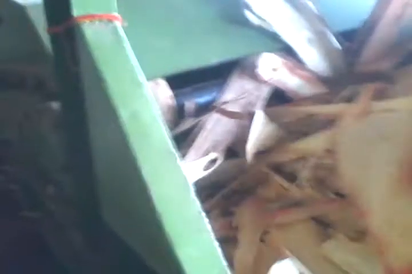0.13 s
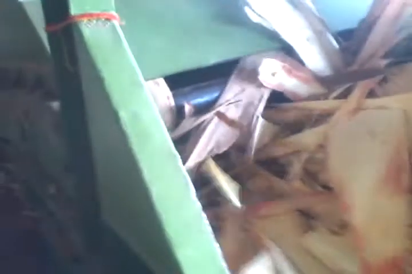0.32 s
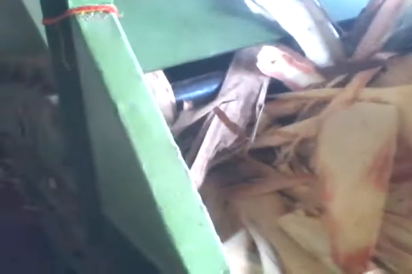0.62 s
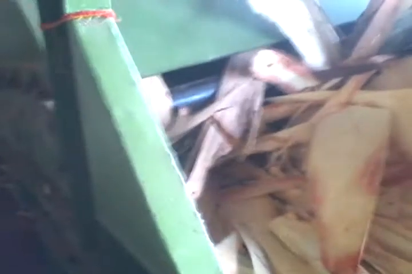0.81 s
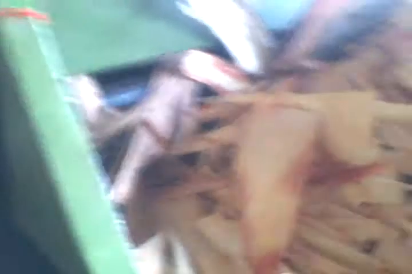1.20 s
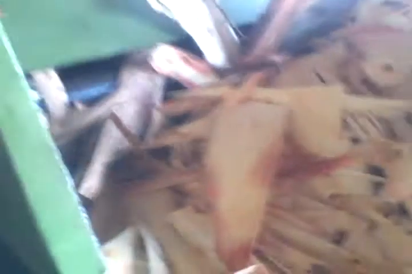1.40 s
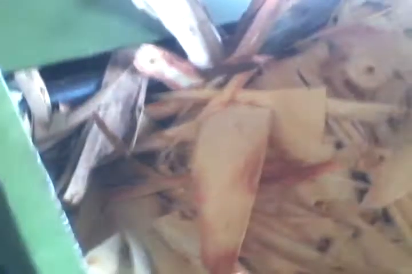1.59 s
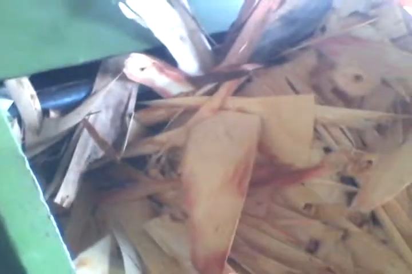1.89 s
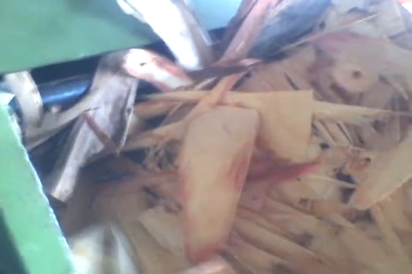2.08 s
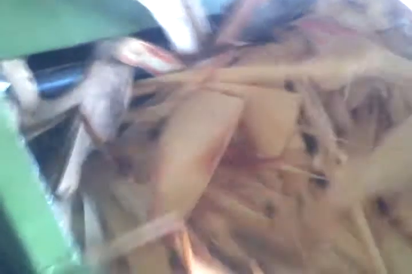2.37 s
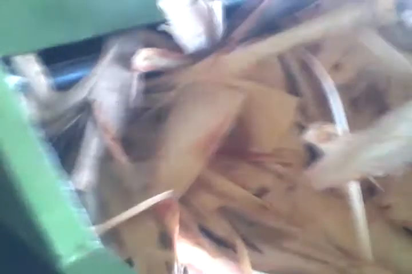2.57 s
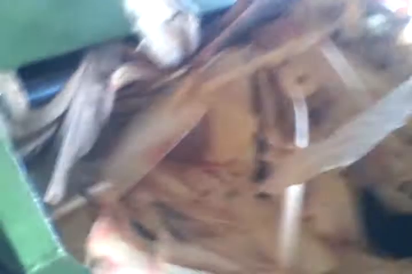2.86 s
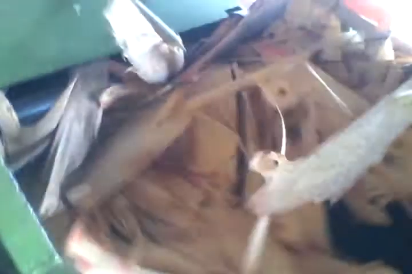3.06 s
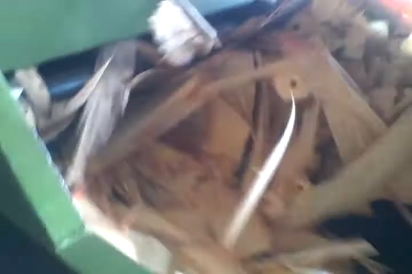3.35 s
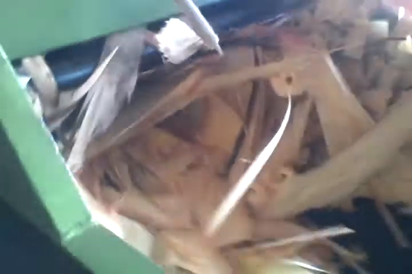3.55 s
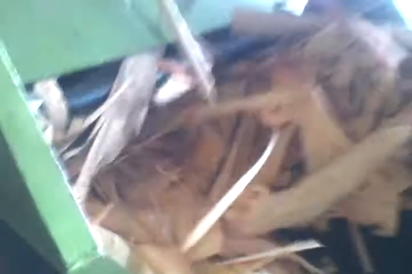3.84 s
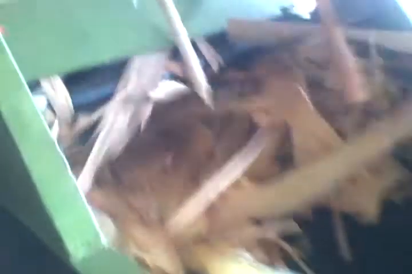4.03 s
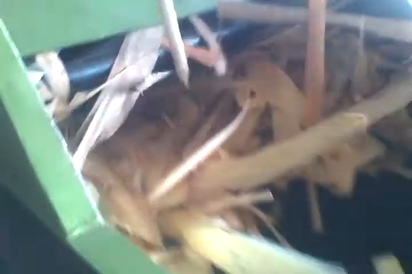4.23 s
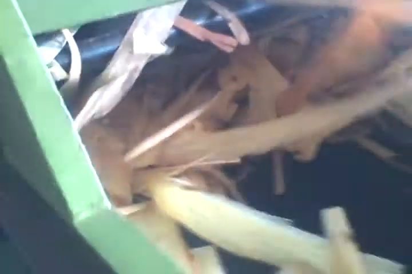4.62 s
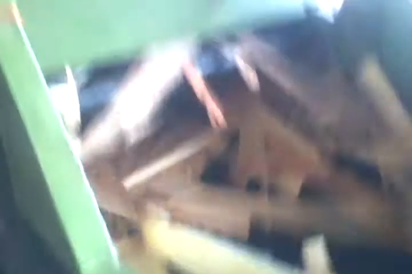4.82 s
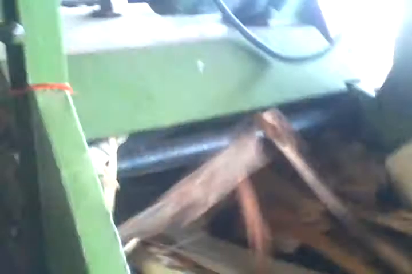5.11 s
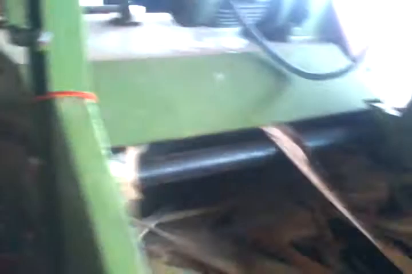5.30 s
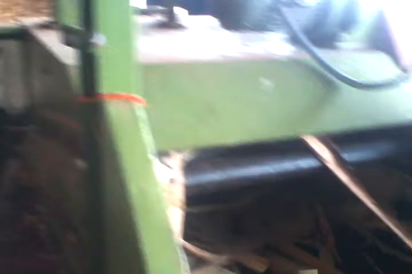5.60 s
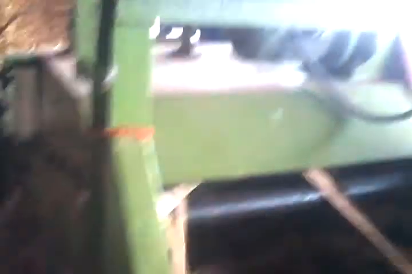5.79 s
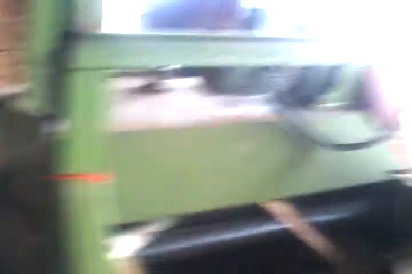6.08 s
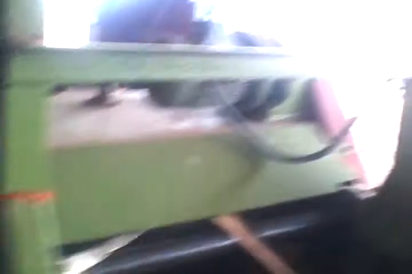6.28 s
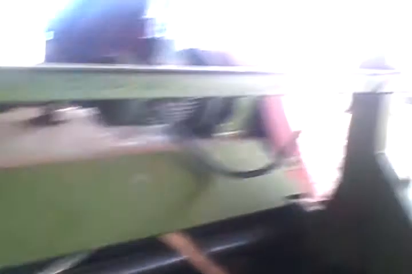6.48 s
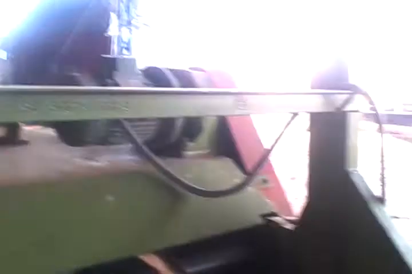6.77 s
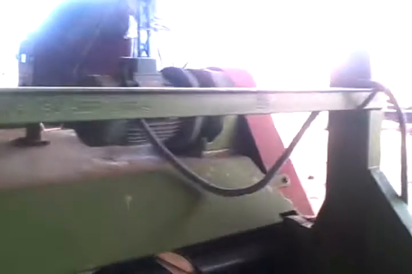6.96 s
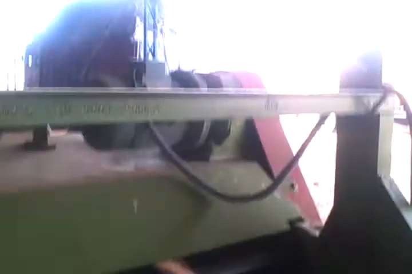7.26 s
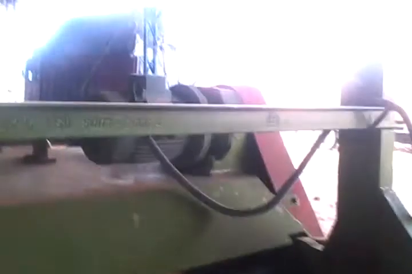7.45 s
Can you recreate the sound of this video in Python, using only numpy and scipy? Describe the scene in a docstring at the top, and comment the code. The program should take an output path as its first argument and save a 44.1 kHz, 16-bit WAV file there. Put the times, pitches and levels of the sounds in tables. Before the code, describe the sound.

A wood chipper runs close by, its drum beating about thirty times a second in a low, boxy hum with faint scrapes. At two seconds a thick piece is caught: loud booming, snapping and rattling spray for over a second. It drops quickly back to a steady drone, with smaller knocks and scraps near the end. Small handheld mono microphone, dull and bass-light.

```python
"""A knock, a boom and a rattling hiss once a turn: a wood chipper close by, through a small mono microphone.
Each knife strike is an impulse that excites the damped modes of frame, hopper and drum.
Plates, chips, splinters and fibres filter the same strikes and the noise of flying scraps.
A thick piece is caught and everything swells; wood snaps or scrapes past a plate.
Low thumps knock the microphone, over a low rumble from the shaking of the hand that holds it."""
import sys
import numpy as np
from scipy import signal
from scipy.fft import rfft, irfft
from scipy.io import wavfile
from scipy.ndimage import uniform_filter1d

SR = 44100
rng = np.random.default_rng(int(sys.argv[2]) if len(sys.argv) > 2 else 0)


def wav_record(signal):
    """Record a signal, one row per channel, as 16-bit PCM in the file named by sys.argv[1]."""
    frames = np.transpose(np.atleast_2d(signal))
    bounded = np.clip(frames, -1, 1)
    # unit amplitude maps onto the largest positive 16-bit level
    quanta = np.round(bounded * 32767).astype(np.int16)
    wavfile.write(sys.argv[1], SR, quanta)


N = 336924  # samples

# Cutter drum, coming up to speed and sagging under load. Each row: time in seconds, turns a second.
DRUM_SPEED = [(0.0, 27.77), (0.8, 30.43), (1.1, 30.64), (1.9, 30.75), (2.2, 30.28), (2.7, 30.37),
              (3.9, 30.6), (5.1, 30.46), (5.9, 30.25), (6.6, 30.66), (7.64, 30.69)]
STRIKE_TURN = .22  # position of the first strike, in turns


def drum_turns():
    """Rotation: the integral of the speed counts turns, and the knife strikes at each whole number."""
    speed, = columns(DRUM_SPEED)
    return np.cumsum(speed) / SR - STRIKE_TURN


JITTER_S = .0011  # scatter of the strike in time, when all the wood is loose


def strikes(turns, spread_db, loose):
    """Jittered impulse train: one click a turn, which loose wood makes less regular in time and strength."""
    at = np.flatnonzero(np.diff(np.floor(turns)) > 0)
    size, slip = rng.standard_normal((len(at), 2)).T
    shift = np.round(JITTER_S * SR * loose[at] * slip).astype(int)
    moved = np.clip(at + shift, 0, N - 1)
    clicks = np.zeros(N)
    clicks[moved] = gain_of(spread_db * loose[at] * size)
    return clicks


# State of the feed. Each row: time in seconds, share of loose tumbling wood 0-1, depth of the beat 0-1,
# listener from 0 at the mouth to 1 beside the drum, packing of the hopper with fronds 0-1 (lowers its boom).
FEED = [(0, .07, .3, 0, 1), (.7, .09, .25, 0, 1), (1, .14, .22, 0, .7), (1.95, .14, .22, 0, .7),
        (2.1, .15, .28, 0, .2), (2.6, .22, .33, 0, 0), (2.85, .27, .48, 0, 0), (3.2, .27, .48, 0, 0),
        (3.6, .09, .46, 0, 0), (4.8, .09, .46, .1, 0), (5.2, .16, .4, .4, 0), (6.1, .14, .45, .5, 0),
        (6.3, .08, .64, 1, 0), (7.64, .08, .62, 1, 0)]
# Slow level of the machine's body. Each row: time in seconds, frame hum, hopper boom, drum knock in dB.
BODY_LEVEL = [(0, -41, -34.5, -45), (.6, -46, -34.5, -45.5), (.68, -47, -39, -47), (1.05, -45, -46.5, -43),
              (2.0, -49.5, -46, -46), (2.015, -40, -31, -39.5), (2.14, -24, -17.5, -22),
              (2.6, -29, -16, -21), (2.74, -37, -20, -16.5), (3.17, -40, -22.5, -31), (3.22, -32, -31, -26),
              (3.34, -38, -38, -36.5), (3.79, -47.5, -40.5, -42), (4.34, -45.5, -40, -40),
              (4.87, -42.5, -39, -39), (5.45, -46, -36, -40), (5.8, -39.5, -32, -35.5),
              (6.1, -45.5, -33.5, -39.5), (6.45, -44.5, -45, -41.5), (7.64, -44.5, -52, -44)]
# Hard bites that jolt the body. Each row: start in seconds, level in dB,
# part that answers most (0 frame, 1 hopper, 2 drum; between or beyond allowed), hold in seconds.
JOLTS = [(0.583, -38, 2.5, 0.018), (2.013, -19.5, 0.8, 0.023), (2.047, -18.5, 1.2, 0.011),
         (2.122, -16, 1.3, 0.067), (2.241, -17, 2.5, 0.16), (2.35, -15.5, 6, 0.03),
         (2.399, -17.5, -0.5, 0.015), (2.468, -12, 1.4, 0.016), (2.573, -17.5, 2.5, 0.042),
         (2.675, -22, 3, 0.018), (2.791, -4, 3.6, 0.049), (2.843, -27, 0, 0.057),
         (2.895, -22.5, 2.5, 0.026), (3.03, -28, 0, 0.059), (3.105, -16.5, 1.5, 0.06),
         (3.244, -21.5, 2.5, 0.017), (5.164, -26, 1.1, 0.007), (5.33, -30.5, 2, 0.042),
         (5.343, -26, 0, 0.025), (5.382, -26.5, 1.7, 0.027), (5.527, -28, -0.3, 0.019),
         (5.653, -22, 3, 0.025), (5.687, -9, 0.9, 0.022), (5.708, -21, 2.5, 0.011), (6.07, -26, 2.3, 0.023),
         (7.375, -49, 4.5, .03)]
# Level of the thick piece itself, ringing at each strike. Each row: time in seconds, level in dB.
STOCK_LEVEL = [(0, -53), (2.0, -61.5), (2.1, -32), (2.6, -37), (2.8, -23.5), (2.93, -23), (3.0, -20),
               (3.16, -23.5), (3.25, -39.5), (3.6, -47), (5.0, -52.5), (5.7, -54), (6.2, -63), (6.5, -52),
               (7.64, -55)]
# Modes of the frame. Each row, as in the six mode tables after it too: frequency in Hz,
# nominal width in Hz, relative level in dB, delay in seconds.
FRAME_MODES = [(126.8, 24.4, -1.5, 0.01086), (156.2, 29, -1.5, 0.0078)]
# Open hopper, same columns [Hz, Hz, dB, s].
HOPPER_MODES = [(210.9, 16, 1.5, 0.00029), (235.5, 37, -3, 0.00094), (271.9, 33.8, 4.5, 0.0011)]
# Hopper packed with fronds [Hz, Hz, dB, s].
PACKED_MODES = [(214.7, 36, -1.7, 0.00511), (239.5, 31, -0.26, 0.00578)]
# Drum heard from the mouth [Hz, Hz, dB, s].
DRUM_MODES = [(316.7, 27, -4.5, 0.00089), (359.2, 13, 1.5, 0.00087), (399.5, 40, -2.5, 0.001)]
# Drum heard from beside it [Hz, Hz, dB, s].
FLANK_MODES = [(318.7, 39, 2.5, 0.004522), (331.2, 44.2, 6, 0.0047), (345.8, 37.2, 0.5, 0.00484),
               (417.7, 10.3, -6.5, 0.00437)]
# Slap on the wood [Hz, Hz, dB, s].
SLAP_MODES = [(391, 220, 0, 0.001)]
# The thick piece of wood [Hz, Hz, dB, s].
STOCK_MODES = [(444, 64, -1.5, 0.002264), (515, 24, 1, 0.00308), (540.5, 34.3, 1, 0.00353),
               (626.4, 32, -2.5, 0.00277)]
BODY_LEAD_S = .0065  # the body's ringing is driven this much before the crack


def body(turns):
    """Modal excitation: strikes ring wood, frame, hopper and drum; tumbling wood blurs the hum with noise."""
    loose, depth, beside, packed = columns(FEED)
    frame_db, boom_db, knock_db = levels(columns(BODY_LEVEL), range(3), JOLTS, reach_db=12,
                                         release_s=.01, wander_db=2.5)
    hit = strikes(turns, 5, loose)
    early = np.roll(hit, -round(BODY_LEAD_S * SR))

    slap = depth * (1 + .5 * beside) * ring(hit, SLAP_MODES)
    out = gain_of(knock_db) * slap
    out += gain_of(columns(STOCK_LEVEL)[0]) * ring(hit, STOCK_MODES, vary_db=2.0)

    # (modes, level dB, share of the power, driving clicks); with a packed hopper the drum answers the later hit
    parts = ((FRAME_MODES, frame_db, 1, early),
             (HOPPER_MODES, boom_db, 1 - packed, early),
             (PACKED_MODES, boom_db, packed, early),
             (DRUM_MODES, knock_db, (1 - beside) * (1 - packed), early),
             (DRUM_MODES, knock_db, (1 - beside) * packed, hit),
             (FLANK_MODES, knock_db, beside, early))
    for modes, db, share, drive in parts:
        noise = spray(turns, 0.53 * depth, fade_turns=0.32, flicker_db=-2.3, grain_db=2.5)
        tumble = ring(noise, modes)
        hum = ring(drive, modes, vary_db=2.5 * np.sqrt(loose))
        blend = np.sqrt(1 - loose) * hum + np.sqrt(loose) * tumble
        out += gain_of(db) * np.sqrt(share) * blend
    return out


# Slow level of the wood being cut. Each row: time in seconds, clatter, chips, splinters,
# hiss of fibres in dB.
CUT_LEVEL = [(0, -48, -55.5, -59, -60.5), (.6, -48, -59, -58, -61.5), (.85, -51, -61, -61.5, -66.5),
             (2.0, -51, -58.5, -56, -64), (2.012, -31.5, -50, -47, -55), (2.11, -41, -38.5, -38.5, -40.5),
             (2.23, -34.5, -38.5, -43.5, -40), (2.33, -33, -40.5, -39, -37.5),
             (2.42, -30.5, -39, -38.5, -40), (2.55, -29.5, -34.5, -37, -37),
             (2.66, -26.5, -34.5, -42, -39.5), (2.76, -31.5, -25.5, -32, -27.5),
             (2.94, -26, -20.5, -32, -32), (3.18, -25, -27, -25.5, -32.5), (3.225, -34.5, -32.5, -43, -43),
             (3.3, -34.5, -30.5, -46, -47), (3.45, -48, -38, -44.5, -50), (3.62, -48.5, -46.5, -52.5, -54),
             (4.17, -48, -48, -53, -59.5), (4.9, -46, -47.5, -52, -54), (5.6, -43.5, -44, -50, -52.5),
             (5.7, -35, -42.5, -46.5, -51), (5.8, -37, -44, -46.5, -53), (6.15, -43, -44, -45, -52),
             (6.32, -45, -45.5, -52, -55.5), (7.64, -44, -46.5, -53, -55.5)]
# Rustle of shredded fronds. Each row: time in seconds, level in dB.
SHRED_LEVEL = [(0, -62.5), (1.97, -62), (2.05, -49), (2.22, -45), (2.4, -39.5), (2.5, -49), (2.62, -35),
               (2.74, -41), (2.82, -50), (2.92, -60), (3.02, -37), (3.12, -45), (3.22, -46), (3.45, -57),
               (3.74, -57), (4.19, -55.5), (5.6, -48.5), (5.85, -43.5), (6.06, -48.5), (6.3, -51.5),
               (7.64, -51.5)]
# Bursts of scraps torn off the wood. Each row: start in seconds, level in dB, fineness (0 clatter, 1 chips,
# 2 splinters, 3 shreds, 4 fibres; between or beyond allowed), hold in seconds.
SPRAYS = [(0.567, -53.5, 3.6, 0.024), (0.876, -52.5, 3.5, 0.027), (1.695, -56.5, 2.5, 0.046),
          (1.835, -50, 2, 0.068), (2.001, -38, -1.5, .012), (2.248, -34.5, 3.5, 0.065),
          (2.254, -32.5, 2.4, 0.04), (2.46, -28.5, 1.42, 0.05), (2.53, -34, 2, 0.032),
          (2.596, -33, 2, 0.03), (2.679, -25, 0.5, 0.033), (2.735, -22, 4.5, 0.025),
          (2.93, -28.5, 4.4, 0.06), (3.08, -32, -6, .025), (3.13, -31, 1, 0.025), (3.162, -29, 1.5, 0.058),
          (3.159, -29.5, 4.5, 0.043), (3.368, -41, 3.5, 0.016), (3.965, -44, 1.3, 0.032),
          (4.474, -46, -4, 0.049), (5.243, -56, -3.5, .06), (5.688, -40, 2.5, 0.08), (5.74, -42, 5.5, 0.04),
          (5.812, -46, 4, 0.018), (5.946, -43.5, 4.5, 0.015), (6.046, -42, 4.5, 0.014),
          (6.098, -33, 3.5, 0.033), (6.137, -41, 3.5, 0.052), (6.936, -46, 2.5, .04)]
# Modes of the plates. Each row, as in the four tables after it too: frequency in Hz,
# nominal width in Hz, relative level in dB, delay in seconds.
PLATE_MODES = [(595, 194, -2, 0.002154), (811.5, 104, 7, 0.00213), (855.6, 125, 6, 0.00097),
               (1090, 430, -7.5, 0.001)]
# Chips, same columns [Hz, Hz, dB, s].
CHIP_MODES = [(1350, 850, 0.0062, 0.001003), (1982, 385, 0.0041, 0.00102)]
# Splinters [Hz, Hz, dB, s].
SPLINTER_MODES = [(2220, 1140, -0.13, 0.0009345), (3340, 420, -1.9, 0.001001)]
# Fibres [Hz, Hz, dB, s].
FIBRE_MODES = [(6050, 200, -6.5, .002), (6434, 1720, 13.5, 0.0019)]
# Shredded fronds [Hz, Hz, dB, s].
SHRED_MODES = [(4750, 2240, 0, .002)]
ECHO_S = 0.00403  # beside the drum the crack comes back off the housing
UNEVEN_START_DB, UNEVEN_SPAN_DB, UNEVEN_GAIN = -42, 10, .6  # the louder the clatter, the more uneven the noise


def cutting(turns):
    """Source and filter: the crack of each strike and a noise spray excite plates and scraps of each fineness."""
    loose, depth, beside = columns(FEED)[:3]
    hit = evened(strikes(turns, 10, loose))
    hit = hit + 0.64 * beside * np.roll(hit, round(ECHO_S * SR))

    slow = columns(CUT_LEVEL) + columns(SHRED_LEVEL)
    fineness = (0, 1, 2, 4, 3)  # clatter, chips, splinters, fibres, shreds
    level = levels(slow, fineness, SPRAYS, reach_db=11, release_s=.027, wander_db=-0.5)
    loudness = np.clip((slow[0] - UNEVEN_START_DB) / UNEVEN_SPAN_DB, 0, 1)
    uneven = 1 + UNEVEN_GAIN * loudness

    # (modes, share of the beat, fade in turns, grain dB and patch dB under quiet clatter, crack);
    # the patch value holds when all the wood is loose
    parts = ((PLATE_MODES, 1.0, .45, 1.5, 6.5, 1.5),
             (CHIP_MODES, .95, .35, 2.2, 8, .7),
             (SPLINTER_MODES, .75, .35, 2.2, 8.5, .4),
             (FIBRE_MODES, .65, .45, 2.1, 8, .08),
             (SHRED_MODES, .7, .4, 2.1, 8.5, .1))
    out = np.zeros(N)
    for (modes, beat, fade, grain_db, patch_db, crack), db in zip(parts, level):
        noise = spray(turns, beat * depth, fade, flicker_db=0.62, grain_db=grain_db * uneven)
        scraps = mottled(noise, patch_db * uneven * np.sqrt(loose))
        drive = scraps + crack * depth * hit
        out += gain_of(db) * ring(drive, modes, vary_db=2.5 * np.sqrt(loose))
    return out


# Wood snapping. Each row: start in seconds, relative level in dB, pitch in Hz.
SNAPS = [(0.868, -38, 673), (2.005, -20, 780), (2.037, -14, 555), (2.271, -5, 764), (2.455, -18, 785),
         (2.668, -13, 700), (2.699, -16, 501), (2.896, -5, 800), (2.927, -15, 902), (2.963, -18, 1210),
         (3.026, -8, 538), (3.09, -3, 520), (3.325, -13, 1230), (3.356, -24, 1910), (3.682, -28, 1820),
         (3.715, -26, 1690), (4.012, -28, 1700), (5.026, -34, 894), (5.661, -20, 710), (5.684, -15, 786),
         (5.719, -23, 1310), (5.786, -10, 650), (6.08, -5.5, 546)]
SNAP_DECAY_S, SNAP_DB = 0.0066, -15.5  # time constant; offset added to every level


def snaps():
    """Sudden fracture: a broad noise band around the pitch of the piece starts at once and decays exponentially."""
    out, t = np.zeros(N), np.arange(1500) / SR
    noises = rng.standard_normal((len(SNAPS), len(t)))
    for (s, db, hz), noise in zip(SNAPS, noises):
        edges = [hz / 2, min(2.5 * hz, MIC_EDGE_HZ)]
        band = signal.butter(2, edges, "band", fs=SR, output="sos")
        burst = evened(signal.sosfilt(band, noise))
        add(out, s, gain_of(db + SNAP_DB) * .5 * burst * np.exp(-t / SNAP_DECAY_S))
    return out


# Pieces scraping past a plate. Each row: start in seconds, level in dB, frequency in Hz,
# length in seconds (at most 0.19 is played).
SCRAPES = [(0.144, -46, 684, 0.082), (0.217, -43, 800, 0.036), (0.25, -49, 848, 0.076),
           (0.339, -41, 788, 0.083), (0.385, -50, 850, 0.072), (0.49, -44, 782, 0.032),
           (0.633, -47, 806, 0.052), (0.86, -43, 6820, 0.042), (1.684, -46.5, 1885, 0.075),
           (1.702, -53, 2650, 0.09), (1.826, -47.5, 2540, 0.043), (1.842, -46, 3180, 0.044),
           (1.84, -49, 1860, 0.042), (2.267, -40, 2194, 0.11), (2.304, -35, 1070, 0.099),
           (2.365, -43, 6600, 0.2), (2.44, -26.5, 775, 0.086), (2.452, -31.5, 3050, 0.035),
           (2.449, -29, 2630, 0.063), (2.461, -39.5, 6800, 0.1), (2.571, -31, 1060, 0.052),
           (2.731, -41, 5720, 0.039), (2.89, -26, 1199, 0.13), (3.061, -27, 2020, 0.089),
           (3.138, -29.5, 3560, 0.088), (3.272, -40.5, 2030, 0.24), (3.33, -34, 1840, 0.12),
           (3.352, -40.5, 2970, 0.049), (3.667, -40.5, 1700, 0.067), (4.452, -45, 7000, 0.078),
           (4.99, -40.5, 880, 0.066), (5.191, -42.5, 2100, 0.061), (5.225, -36, 850, 0.11),
           (5.327, -42, 1650, 0.1), (5.42, -46.5, 4420, 0.063), (5.486, -44, 6100, 0.051),
           (5.653, -42, 2050, 0.093), (5.687, -37, 1320, 0.1), (5.934, -51, 6590, 0.068),
           (6.035, -41.5, 5800, 0.052), (6.083, -32, 6200, 0.05), (5.977, -43.5, 1834, 0.12),
           (6.131, -40, 1925, 0.089), (6.127, -39.5, 5430, 0.075)]


def scrapes():
    """Friction: a rasp excites one narrow resonance, made as slow complex noise shifted up to its pitch."""
    out, rasp = np.zeros(N), rng.standard_normal((len(SCRAPES), SR // 5, 2))
    for (s, db, hz, length), noise in zip(SCRAPES, rasp):
        t = np.arange(round(np.clip(length, .01, .19) * SR)) / SR
        r = np.exp(-np.pi * .115 * hz / SR)  # width as a share of the pitch
        complex_noise = noise[:len(t), 0] + 1j * noise[:len(t), 1]
        waver = signal.lfilter([1], [1, -2 * r, r * r], complex_noise)
        waver = waver + 0.51 * np.std(waver)  # part of the rasp holds a steady tone
        tone = evened((waver * np.exp(2j * np.pi * hz * t)).real)
        add(out, s, gain_of(db) * tone * signal.windows.tukey(len(t), .7))
    return out


# Low thumps of handling or wind at the microphone. Each row: start in seconds, relative level in dB,
# frequency in Hz, time to fall by 60 dB in seconds.
THUMPS = [(0.977, -35, 95, 0.04), (5.172, -23, 95, 0.025), (5.328, -28, 96, 0.04), (5.369, -23, 97, 0.039),
          (5.528, -36, 96, 0.036), (5.659, -33, 95, 0.041), (5.683, -20, 93, 0.052),
          (6.085, -28.5, 95, 0.063), (6.22, -33, 95, 0.049)]


def thumps():
    """Damped oscillation: each thump of handling or wind is a short low push that swings back as it dies away."""
    out, t = np.zeros(N), np.arange(SR // 4) / SR
    for s, db, hz, t60 in THUMPS:
        decay = gain_of(db + 5.0 - 60 * t / t60)
        onset = 1 - np.exp(-t / 0.0036)
        add(out, s, decay * onset * np.sin(2 * np.pi * hz * t))
    return out


# Spectrum of the rumble. Each row: frequency in Hz, relative level in dB per Hz.
RUMBLE_SPECTRUM = [(15, -14.5), (40, -4.5), (60, -7), (90, -12), (130, -12.5), (200, -47.5)]
# Shaking of the microphone. Each row: time in seconds, level in dB.
SHAKE_LEVEL = [(0, -62), (1.97, -78), (2.04, -42), (2.5, -49), (3.2, -61), (3.6, -64), (5, -69), (5.7, -57),
               (6.3, -64), (7.64, -68)]


def rumble():
    """Spectral shaping: white noise weighted towards the bass is the shaking of the hand-held microphone."""
    hz, (f, db) = np.fft.rfftfreq(N, 1 / SR), np.transpose(RUMBLE_SPECTRUM)
    weight = gain_of(np.interp(np.log(hz + 1), np.log(f), db, right=-120))
    noise = irfft(rfft(rng.standard_normal(N)) * weight, N)
    return gain_of(columns(SHAKE_LEVEL)[0]) * evened(noise)


def ring(drive, modes, vary_db=None):
    """Modal synthesis: delayed, swelling and dying modes, neighbours in opposite sense, levels varied at will."""
    longest = .012 + 1.6 / min(m[1] for m in modes)
    t = np.arange(round(SR * longest)) / SR
    answers = []
    for k, (hz, width, db, delay) in enumerate(modes):
        u = np.maximum(t - delay, 0)
        shape = u * np.exp(-np.pi * 1.55 * width * u) * np.sin(2 * np.pi * hz * u)
        answers.append((-1) ** k * gain_of(db) * np.sqrt(width) * shape / np.linalg.norm(shape))
    if vary_db is None:
        return evened(signal.oaconvolve(drive, sum(answers))[:N])
    out = np.zeros(N)
    for answer in answers:  # each mode is driven unevenly in its own way
        steps = np.repeat(rng.standard_normal(N // 2000 + 1), 2000)[:N]
        wander = gain_of(vary_db * uniform_filter1d(steps, size=800))
        out += signal.oaconvolve(drive * wander, answer)[:N]
    return evened(out)


def spray(turns, depth, fade_turns, flicker_db, grain_db):
    """Amplitude modulation: noise jumps at each strike and thins until the next, with flicker and fine grain."""
    depth = np.clip(depth, 0, 1)
    beat = 1 - depth + depth * 2.0 * np.exp(-(turns % 1) / fade_turns)
    slow = uniform_filter1d(rng.standard_normal(N), size=700)
    flicker = evened(uniform_filter1d(slow, size=300))
    grain = evened(uniform_filter1d(rng.standard_normal(N), size=40))
    envelope = beat * gain_of(flicker_db * flicker + grain_db * grain)
    return evened(envelope * rng.standard_normal(N))


def mottled(x, patch_db):
    """Time-frequency modulation: random narrow patches grow louder and softer, giving noise an uneven colour."""
    _, at, z = signal.stft(x, nperseg=1024, noverlap=768)
    patches = rng.standard_normal(z.T.shape).T
    for _ in range(2):
        patches = uniform_filter1d(patches, size=3, axis=0)  # across frequency
        patches = uniform_filter1d(patches, size=6, axis=1)  # across time
    gain = gain_of(evened(patches) * np.interp(at, np.arange(N), patch_db))
    z = z * gain / np.sqrt(np.mean(gain ** 2, axis=0))
    return evened(signal.istft(z, nperseg=1024, noverlap=768)[1][:N])


ATTACK_S = 0.0011


def levels(slow, places, events, reach_db, release_s, wander_db):
    """Addition of powers: each part's slow dB curve wanders with uneven feed; events attack, hold and release."""
    t, loose, out = np.arange(SR // 3) / SR, columns(FEED)[0], []
    for part, db in zip(places, slow):
        steps = np.repeat(rng.standard_normal(N // 1500 + 1), 1500)[:N]
        wander = wander_db * np.sqrt(loose) * evened(uniform_filter1d(steps, size=1500))
        power = gain_of(db + wander) ** 2
        for s, peak_db, centre, hold in events:
            release = np.exp(-np.maximum(t - ATTACK_S - hold, 0) / release_s)
            shape = np.minimum(t / ATTACK_S, 1) * release
            part_db = peak_db - reach_db * (part - centre) ** 2  # reach: loss one part away
            add(power, s, (gain_of(part_db) * shape) ** 2)
        out.append(10 * np.log10(power))
    return out


def gain_of(db):
    """Logarithmic level: decibels to an amplitude factor."""
    return 10 ** (np.asarray(db) / 20)


def evened(x):
    """Effective value: scales to rms 1."""
    return x / np.sqrt(np.mean(x ** 2) + 1e-20)


def columns(rows):
    """Linear interpolation: every column of a curve table, sample by sample."""
    s, *values = np.transpose(rows)
    return [np.interp(np.arange(N) / SR, s, v) for v in values]


def add(mix, s, sound):
    """Superposition: adds a sound into the mix at time s."""
    part = mix[round(s * SR):][:len(sound)]
    part += sound[:len(part)]


MIC_LOW_HZ = 118


def scene():
    """Superposition of all sources in two equal channels; the small microphone drops the deep bass of the air."""
    turns = drum_turns()
    airborne = body(turns) + cutting(turns) + snaps()
    low_cut = signal.butter(4, MIC_LOW_HZ, "high", fs=SR, output="sos")
    mix = signal.sosfilt(low_cut, airborne) + rumble() + thumps() + scrapes()
    return np.array([mix, mix])


MIC_RATE_HZ, MIC_EDGE_HZ, EDGE_HZ = 16000, 7300, 9800  # microphone's sampling rate, its edge, final edge


def record(dry):
    """Spectral imaging: the microphone is sampled slowly, and raising the rate leaks a faint mirrored treble."""
    mic_low_pass = signal.firwin(301, MIC_EDGE_HZ, window=("kaiser", 8), fs=SR)
    band = signal.oaconvolve(dry, mic_low_pass[None], "same")
    mirror = band * 2 * np.cos(2 * np.pi * MIC_RATE_HZ * np.arange(N) / SR)
    above = signal.firwin(301, MIC_RATE_HZ / 2, pass_zero=False, window=("kaiser", 8), fs=SR)
    raised = band + gain_of(-24.5) * signal.oaconvolve(mirror, above[None], "same")
    final_low_pass = signal.firwin(511, EDGE_HZ, window=("kaiser", 9), fs=SR)
    return signal.oaconvolve(raised, final_low_pass[None], "same")


dry = scene()
out = record(dry)
wav_record(out)
```